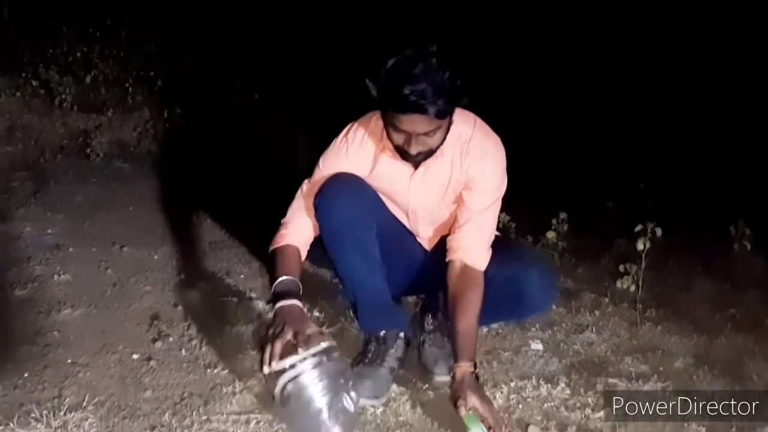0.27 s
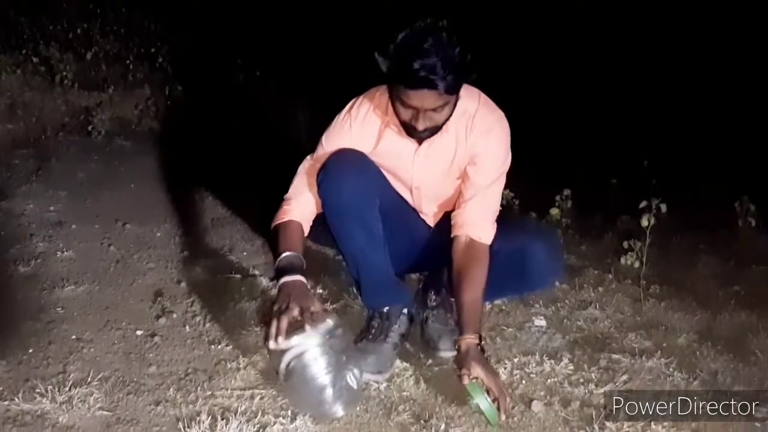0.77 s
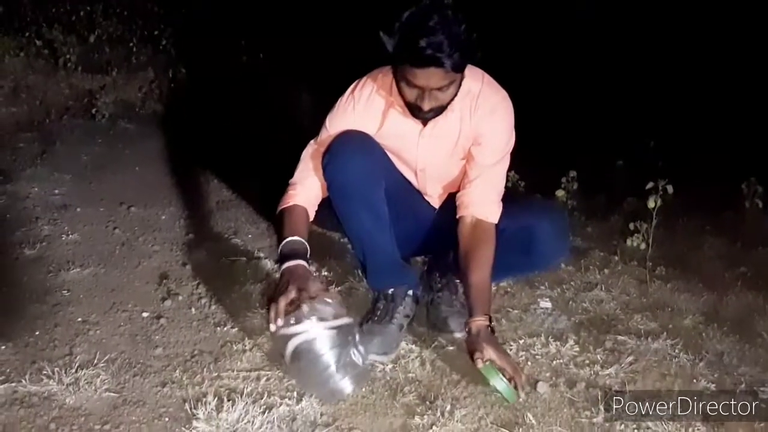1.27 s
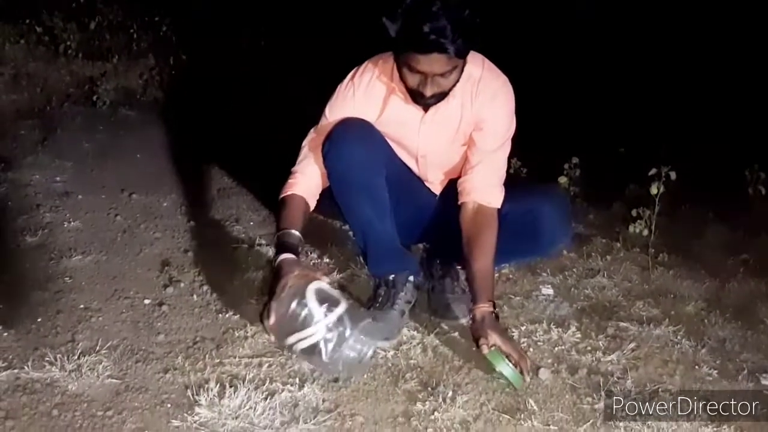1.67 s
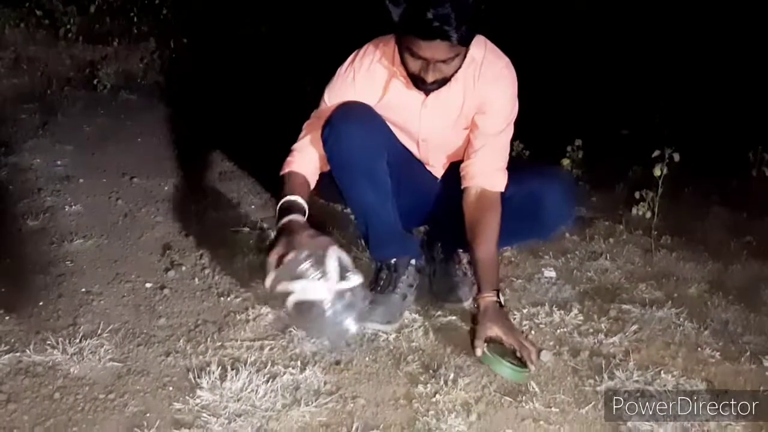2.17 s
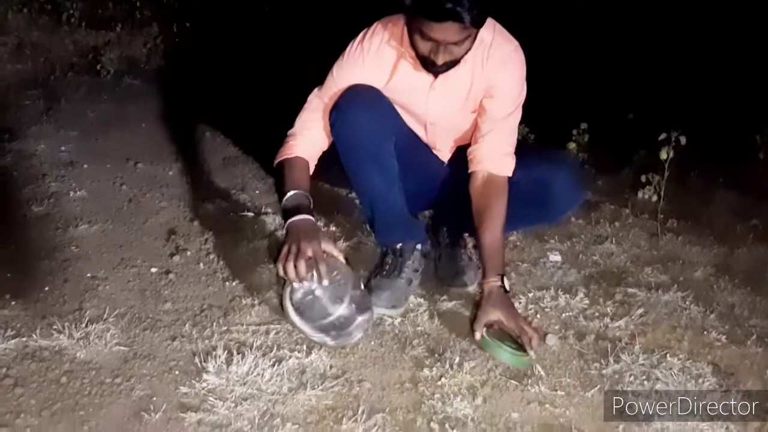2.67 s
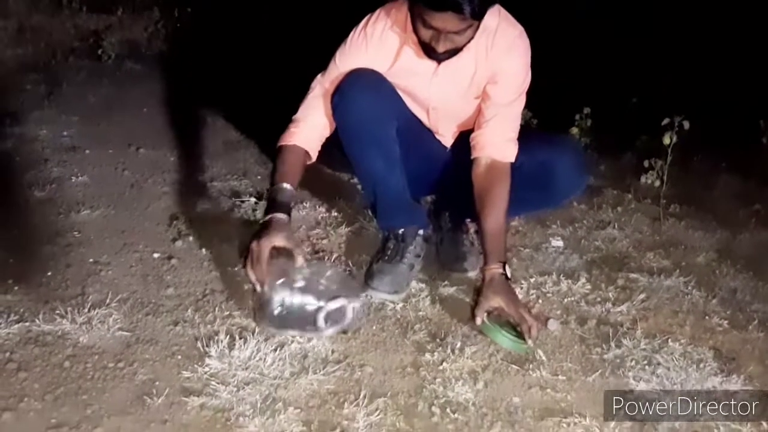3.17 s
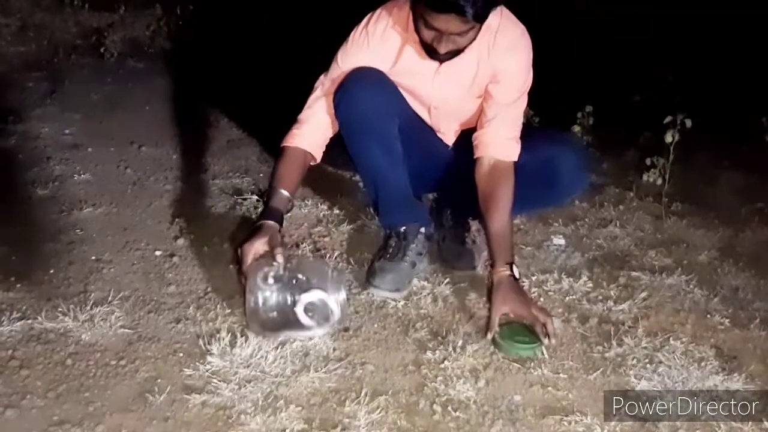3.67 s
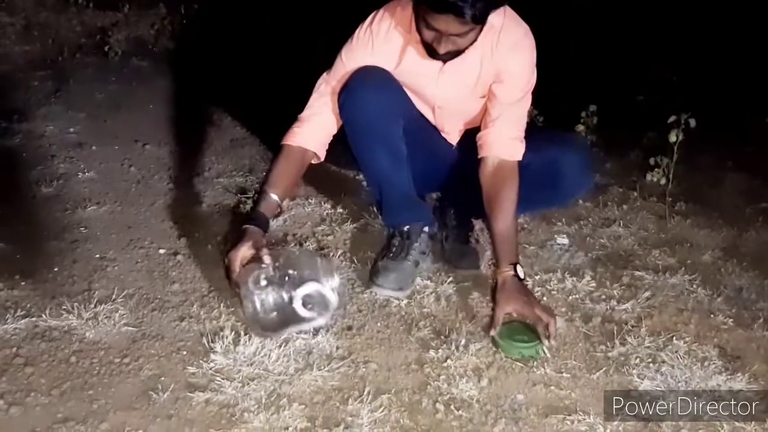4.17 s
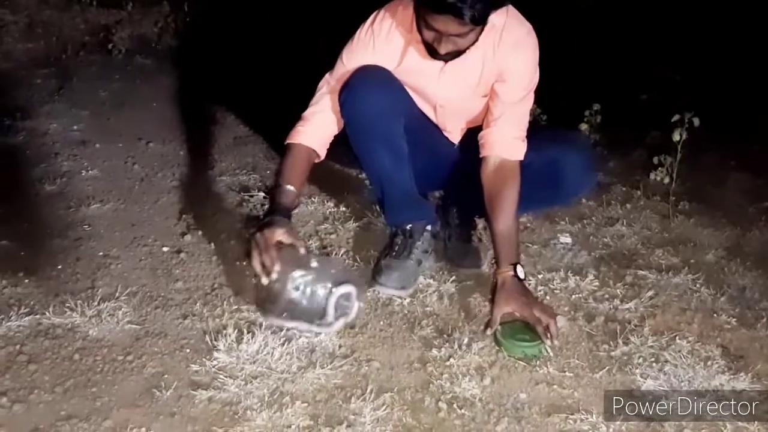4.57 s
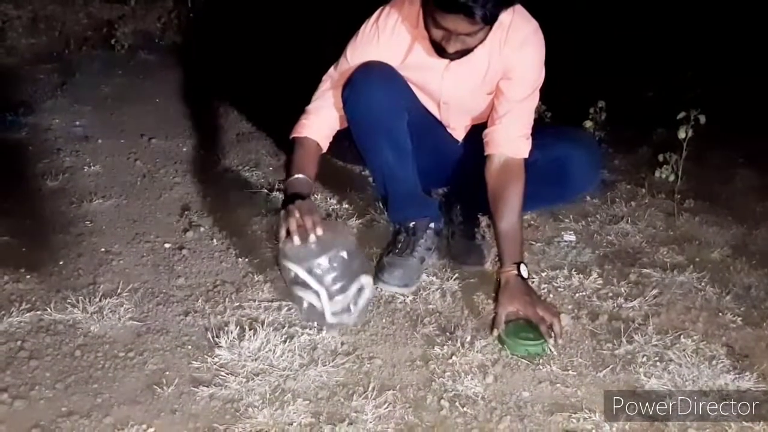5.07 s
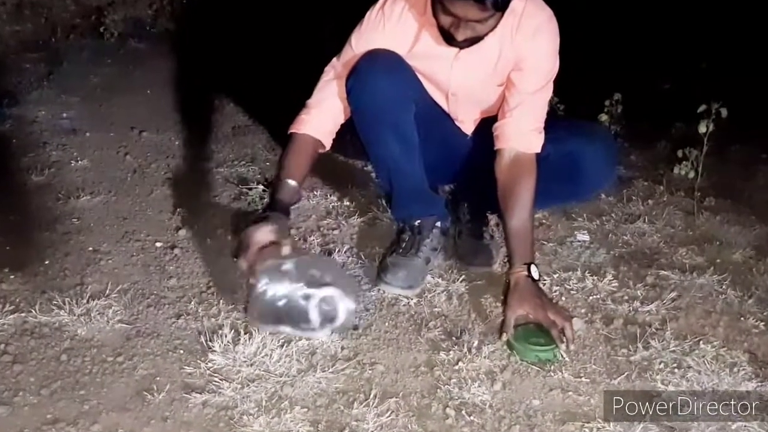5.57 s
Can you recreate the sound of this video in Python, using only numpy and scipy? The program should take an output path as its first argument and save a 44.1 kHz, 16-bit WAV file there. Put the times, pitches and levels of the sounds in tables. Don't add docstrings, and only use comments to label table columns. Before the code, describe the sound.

Close stereo pickup of a thin-walled jar moved by hand over dry grass and grit: crisp taps with low hollow booms first, a quiet gap, a clattering roll and a rumbling gravel scrape midway, then dry stalk swishes and loud brittle snaps. Continuous fast, buzzing insect trills fill the open night air, with almost no reverberation; the jar leans right.

```python
import sys
import numpy as np
from scipy import signal
from scipy.fft import rfft, irfft, next_fast_len
from scipy.io import wavfile
from scipy.ndimage import uniform_filter1d, minimum_filter1d, map_coordinates

SR = 44100
rng = np.random.default_rng(int(sys.argv[2]) if len(sys.argv) > 2 else 0)


def wav_out(sig):
    wavfile.write(sys.argv[1], SR, np.round(np.clip(np.atleast_2d(sig).T, -1, 1) * 32767).astype(np.int16))


def makeup_ratio(level_db):
    decades = np.asarray(level_db, float) / 20
    return 10 ** decades


N = 256087

# time in seconds, high singer in cycles, low singer in cycles.
TRILL_DRIFT = [(0, 0, .4), (.5, -.31, .3), (1, -.57, .15), (1.5, -.71, .2), (2.25, -.64, .21),
               (2.5, -.72, .24), (3.1, -.83, .27), (4, -.73, .38), (5, -.62, .5), (5.81, -.5, .5)]
# start in seconds, end in seconds, level in dB.
LOW_LEAN = [(1.2, 4.4, -9)]
# time in seconds, right over left in dB.
TRILL_FACING = [(0, -11.5), (3.1, -16.5), (3.5, -3.5), (4.3, -5.5), (4.6, -8), (5.81, -6.5)]
# centre in Hz, width in Hz, level in dB.
CHORUS_BANDS = [(2380, 220, -69), (3640, 140, -74)]
# start in seconds, end in seconds, level in dB.
CRICKET_BOUTS = [
    (-.1, .33, -71),
    (.58, 1.0, -72),
    (1.32, 1.775, -73),
    (2.15, 2.41, -71),
    (2.88, 3.12, -73),
]
# time into the bout in seconds, wing strokes per second.
CRICKET_TIRING = [(.1, 43), (.27, 25)]
# start in seconds, end in seconds, level in dB.
THIN_SWELLS = [
    (.07, .22, -68),
    (.62, .86, -66.5),
    (1.7, 1.86, -68),
    (2.78, 3.0, -67),
    (3.95, 4.13, -56),
    (4.84, 4.96, -71.5),
    (5.06, 5.2, -59),
]
# frequency in Hz, density in dB per Hz.
AIR_SPECTRUM = [(30, -110), (70, -88.5), (200, -103), (1000, -109), (3000, -111), (5500, -113),
                (8300, -116), (9300, -114), (11500, -112), (15300, -112), (16000, -130)]

# centre in Hz, width in Hz, level in dB.
RUMBLE_MODES = [(48.3, 40, -3), (68.8, 29.5, 6), (128, 88.6, -2.5), (240, 186, -11.5)]
# peak in seconds, rise in seconds, fall in seconds, level in dB.
RUMBLE_BURSTS = [(.01, 0.058, 0.062, -47.5), (.14, 0.075, 0.07, -45), (.3, 0.13, 0.48, -50),
                 (.75, 0.27, 0.39, -69.5), (1.38, 0.38, 0.19, -65), (1.86, 0.016, 0.077, -48),
                 (2.13, 0.021, 0.066, -48.5), (2.64, 0.055, 0.085, -35), (2.82, 0.13, 0.17, -48.5),
                 (3.06, 0.12, 0.073, -38.5), (3.2, 0.081, 0.088, -36), (3.33, 0.092, 0.23, -33),
                 (3.67, 0.14, 0.14, -51), (3.82, 0.051, 0.084, -43.5), (3.94, 0.092, 0.068, -52.5),
                 (4.3, 0.12, 0.6, -51.5), (4.74, 0.136, 0.16, -56), (5.1, 0.1, 0.16, -56.5),
                 (5.29, 0.039, 0.17, -74)]
# centre in Hz, width in Hz, level in dB.
SHELL_MODES = [(2540, 460, -9), (2700, 160, -4.5), (3360, 84, -2), (3558, 170, 5), (3710, 360, 3.5),
               (4414, 260, 7), (4890, 340, -3.5), (5224, 320, -0.5), (5680, 93, -5.5), (6010, 260, -2.5),
               (6900, 3600, -14.5)]
# centre in Hz, width in Hz, level in dB.
WALL_MODES = [(556, 140, -3.5), (945, 88, 0), (1063.6, 62, 2), (1286, 140, -2.5), (1540, 170, -1.5),
              (2018, 88, -0.5), (2270, 260, -8), (2790, 210, -4), (3230, 340, -9.5)]
# centre in Hz, width in Hz, level in dB.
BODY_MODES = [(165, 30, -5), (218, 18, 1.5), (273, 28, 3.5), (350, 52, -9.5), (428, 38, 0), (627, 200, -10)]
# centre in Hz, width in Hz, level in dB.
BOOM_MODES = [(78.5, 25, -11.5), (103, 28, 10)]

# start in seconds, crack in dB,
# body over crack in dB, panel note in Hz, wall ring over crack in dB.
THUD_HITS = [
    (.1344, -64.5, 7.5, 265, -5),
    (.2074, -66, 12, 165, -1),
    (.068, -70.5, 12.5, 152, -9),
    (.35, -68.5, 8.5, 180, -10.5),
    (1.8489, -70, 11, 183, -12),
    (2.1202, -69.5, -8, 188, 8.5),
    (3.914, -43, -10.5, 414, -4),
]
# time in seconds, peak in dB.
PEBBLE_CLICKS = [
    (.128, -44),
    (2.12, -44),
    (2.698, -36),
    (3.1505, -12),
    (3.169, -35),
    (3.179, -33),
    (3.285, -33),
    (3.4066, -15),
    (3.503, -36),
]
# start in seconds, pitch in Hz, level in dB, t60 in seconds.
BODY_SWINGS = [(.135, 70, -28.5, 0.065), (.245, 100, -35, 0.07), (.295, 70, -36.5, 0.072),
               (.438, 265.3, -22.5, .13), (.59, 100, -32, 0.076), (.44, 655, -33.5, .12),
               (1.855, 200, -40.5, 0.038), (3.845, 132, -32, 0.055), (.906, 262, -21.5, .12),
               (.912, 106.5, -18.5, 0.087), (1.147, 290, -24.5, 0.12), (1.153, 114, -17, 0.072),
               (1.31, 240, -34.5, .1), (1.312, 109.3, -21, 0.075), (1.53, 140, -29, .06),
               (1.85, 74, -38.5, 0.067), (2.125, 84, -34.5, 0.13), (2.465, 240, -29.5, .08),
               (2.5, 128, -23, 0.084), (2.51, 261.7, -24.5, .1), (2.56, 240, -26, .06),
               (2.602, 237, -8.5, 0.077), (2.604, 129.3, -16.5, 0.13), (2.622, 250, -14, 0.077),
               (2.67, 250.7, -25, .06), (3.055, 70, -30.5, 0.081), (3.845, 400, -24, 0.027)]
# start in seconds, crack in dB,
# body over crack in dB, panel note in Hz, wall ring over crack in dB.
BASE_TAPS = [
    (.2382, -23.5, -12.5, 465, -14.5),
    (.2813, -46, 4.5, 243, -8.5),
    (.579, -27, -4, 430, -13.5),
    (.7227, -40, -15.5, 555, -15),
    (.9004, -11, -14, 413, -15),
    (1.1419, -14, -8.5, 332, -15),
    (1.3054, -24, 1.5, 200.4, -5),
    (1.5265, -22.5, -11, 463, -10),
]
# start in seconds, pitch in Hz, level in dB, t60 in seconds.
STRIKE_SPOTS = [(.2385, 4100, -25, 0.02), (.4155, 4280, -23, 0.019), (.431, 4000, -32, .03),
                (.431, 2153, -30, 0.075), (.5795, 3910, -30, 0.034), (.9005, 3754, -18, 0.042),
                (.9005, 4000, -15.5, 0.033), (.9005, 4930, -23, 0.034), (1.142, 3770, -45, 0.033),
                (2.497, 1062, -11.5, 0.044), (2.497, 2006, -9, 0.032), (2.5965, 2910, -15, 0.016),
                (2.5965, 1510, -18, 0.026), (4.383, 2275, -3, 0.015), (4.383, 2740, -13.5, 0.066),
                (4.383, 3170, -3.5, 0.018), (4.383, 3470, -17.5, .03), (4.384, 4400, -16, 0.05),
                (4.383, 5120, -4.5, 0.024), (4.383, 2048, -17.5, 0.091), (5.282, 4040, -11.5, 0.026),
                (5.282, 4570, -19, 0.037), (5.283, 5260, -8, 0.045), (5.282, 1042, -22.5, 0.053),
                (5.282, 3430, -17, .04)]
# peak in seconds, rise in seconds, fall in seconds, level in dB.
GRAVEL_GRINDS = [
    (.3, 0.081, 0.093, -64),
    (1.3, 0.34, 0.62, -63.5),
    (2.66, 0.16, 0.13, -49.5),
    (3.24, 0.19, 0.21, -45.5),
    (3.36, 0.12, 0.21, -38.5),
    (3.6, 0.1, 0.072, -58),
    (4.15, 0.27, 0.96, -60.5),
    (4.65, 0.29, 0.11, -49.5),
    (5.7, 0.08, 0.47, -59),
]
# frequency in Hz, level in dB.
GRAVEL_SPECTRUM = [(150, -43), (250, -3.5), (467, -6), (675, -5.5), (746, -11), (834, -11.5), (1510, -4),
                   (3600, -10), (5400, -23), (7920, -120)]
# start in seconds, crack in dB,
# body over crack in dB, panel note in Hz, wall ring over crack in dB.
DRY_SNAPS = [
    (.4152, -27, -31, 314, -34),
    (1.076, -58.5, -6, 294, -1.5),
    (4.8228, -45, -43, 295, -38.5),
]
# time in seconds, peak in dB.
PLASTIC_TICKS = [(0.422, -38), (0.5787, -51), (0.9023, -37.5), (1.1422, -36), (1.5249, -54),
                 (2.4873, -40.5), (2.597, -57.5), (3.045, -51.5), (3.8177, -45), (3.8397, -33.5),
                 (4.3226, -35.5), (4.3823, -26), (4.9732, -42.5), (5.282, -17), (5.6309, -47)]
# start in seconds, crack in dB,
# body over crack in dB, panel note in Hz, wall ring over crack in dB.
RATTLE_BUMPS = [
    (.4295, -15, -5.5, 427, -14.5),
    (3.045, -25, -41, 375, -9),
    (3.8135, -29, -26.5, 411, -24),
    (3.8212, -19.5, -48, 403, -9),
    (3.862, -29, -21.5, 302, -49),
    (4.5095, -25.5, -32.5, 460, -8.5),
]
# start in seconds, crack in dB,
# body over crack in dB, panel note in Hz, wall ring over crack in dB.
STALK_CATCHES = [(1.056, -70.5, 15, 195, -1), (2.468, -43, -27, 300, -25), (2.541, -49, -15, 300, -2),
                 (3.257, -44, -22, 300, -12), (3.33, -50, 8, 288, 4), (3.39, -38, -36, 298, -7),
                 (3.405, -29.5, -42, 300, -8.5), (3.455, -46, -34, 300, -26), (3.601, -50, -23, 500, 1),
                 (3.636, -46, -40, 300, -17.5), (3.74, -58, -30, 296, -26), (4.004, -57, -42, 300, -4),
                 (4.139, -52, -15, 302, -12), (4.213, -41, -18, 300, -29), (4.64, -32.5, -8, 435, -10.5),
                 (4.655, -32, -22, 458, -19), (4.7, -37, -30, 300, -23), (4.74, -41, -38, 300, -15),
                 (5.216, -41.5, -29, 298, -28), (5.315, -43, -8, 400, -18), (5.65, -31, -30.5, 302, -21),
                 (4.229, -44.5, -29, 296, -34), (4.276, -51, -30, 303, -25), (4.489, -35, -31, 300, -32),
                 (4.555, -49, -16, 470, -27), (4.721, -49, -30, 298, -29), (5.493, -45, -23, 303, -29.5),
                 (5.534, -38, -29, 300, -27), (5.584, -42.5, -28.5, 300, -31), (5.613, -51, -33, 302, -19),
                 (5.765, -46.5, -31, 304, -13.5)]
# peak in seconds, rise in seconds, fall in seconds, level in dB.
GRASS_SWISHES = [(1.33, 0.17, 1, -72), (2.0, .12, 0.084, -61), (2.46, 0.048, .1, -46.5),
                 (2.65, 0.11, 0.086, -48), (3.04, 0.044, 0.16, -54), (3.2, 0.042, 0.11, -61),
                 (3.38, 0.21, 0.127, -45.5), (3.46, 0.12, 0.087, -46.5), (3.68, 0.34, 0.65, -50),
                 (4.1, 0.14, 0.28, -52.5), (4.4, 0.21, 0.36, -47), (4.69, 0.17, 0.19, -39),
                 (5.22, 0.61, 0.13, -62.5), (5.52, 0.22, 0.22, -52), (5.65, 0.13, 0.076, -38.5),
                 (5.76, 0.15, 0.39, -44.5)]
# frequency in Hz, level in dB.
GRASS_SPECTRUM = [(1060, -27.5), (1800, -17), (2210, -15.5), (2810, -10), (4260, -2.5), (6900, -8),
                  (7930, -21.5), (8310, -28.5), (8700, -80.5), (10600, -26.5), (13200, -23), (15300, -38),
                  (16500, -66.5)]
# start in seconds, crack in dB,
# body over crack in dB, panel note in Hz, wall ring over crack in dB.
STONE_ROLLS = [(1.4615, -54.5, -2, 330, 3.5), (1.603, -55, 9.5, 350, 5.5), (2.4477, -40, 1.5, 327, 2.5),
               (2.4859, -22, -1.5, 244.3, 4.5), (2.556, -40.5, -1, 242.3, 2.5),
               (2.5959, -12.5, -11.5, 219.4, 1), (2.64, -35, 2.5, 379, 6), (2.6457, -30.5, -2, 230.8, 5.5),
               (2.668, -31, -8, 240, 4.5), (2.9118, -58, 18, 251, 4.5), (2.991, -55.5, 19.5, 197, 5),
               (3.8412, -10.5, -13, 307, 1.5)]
# start in seconds, crack in dB,
# body over crack in dB, panel note in Hz, wall ring over crack in dB.
RIM_CRACKS = [
    (1.9518, -38, -37, 199, -47),
    (1.991, -45, -20.5, 387, -17),
    (2.7313, -47, -12.5, 237.5, -20),
    (4.322, -20.5, -12.5, 422, -10.5),
    (4.3821, -4.5, -31.5, 389, -20),
    (5.281, -2, -20.5, 394, -15.5),
]
# start in seconds, crack in dB,
# body over crack in dB, panel note in Hz, wall ring over crack in dB.
SLOW_SCUFFS = [
    (2.4332, -47, 6, 300, -6.5),
    (3.1783, -38.5, -6, 240, -8),
    (3.2481, -41.5, 4.5, 215, 0),
    (3.3479, -42.5, -21, 196, 5.5),
    (3.5882, -55, -20, 483, 7.5),
    (3.7029, -62, -25, 180, -3),
    (4.0654, -31.5, -26.5, 493, -10),
]
# start in seconds, crack in dB,
# body over crack in dB, panel note in Hz, wall ring over crack in dB.
ROLL_JOLTS = [
    (2.466, -42, -2, 254, -2),
    (2.4952, -27, -0.5, 263, 4),
    (3.034, -43.5, 13.5, 503, 1.5),
]
# start in seconds, end in seconds, pitch in Hz, level in dB.
WALL_SQUEAKS = [(3.031, 3.054, 700, -43), (3.58, 3.638, 1080, -74.5), (3.768, 3.786, 1010, -46.5),
                (4.006, 4.138, 1540, -54.5), (3.026, 3.093, 1540, -47.5), (3.623, 3.734, 1540, -62),
                (4.149, 4.214, 996, -58), (4.21, 4.255, 945, -49.5), (4.254, 4.315, 980, -54.5),
                (4.557, 4.686, 498, -49.5), (4.707, 4.826, 1046, -62), (5.414, 5.587, 530, -75.5),
                (5.625, 5.757, 1430, -48.5), (5.72, 5.751, 422, -59.5)]
# start in seconds, crack in dB,
# body over crack in dB, panel note in Hz, wall ring over crack in dB.
WALL_BRUSHES = [
    (3.438, -32.5, -40, 250, -40),
    (4.6794, -28.5, -31, 532, -46),
    (4.97, -26, -19.5, 437, -24.5),
    (5.235, -39.5, -19.5, 405, -24),
    (5.637, -23, -32, 400, -33),
]

# frequency in Hz, left minus right in dB.
PORT_BALANCE = [(60, -11.5), (200, -9), (700, -9.5), (2400, -11.5), (4400, -18), (7000, -3.5), (13000, -12)]
# time in seconds, left port gain in dB.
LEFT_SHADE = [(0, 1), (.8, 4.5), (1.6, 3), (2.4, 5), (2.9, 5), (3.3, -7), (3.7, -1), (4.2, -3.5),
              (4.7, -0.5), (5.2, -2), (5.81, -1.5)]
# time in seconds, gain change in dB.
GAIN_DUCKS = [
    (4.393, -6.5),
    (5.285, -6.5),
]
# frequency in Hz, gain in dB.
MIC_RESPONSE = [(15, -14), (40, 1), (6000, -0.5), (8350, -9.5), (8550, -22.5), (10000, -11), (11500, 2),
                (15500, 6), (16600, -14.5)]


def unit(x):
    return x / np.sqrt(np.mean(x ** 2) + 1e-20)


def along(points, hz):
    f, v = np.transpose(points)
    return np.interp(np.log(hz + 1), np.log(f + 1), v)


def curves(rows):
    s, *columns = np.transpose(rows)
    return [np.interp(np.arange(N) / SR, s, column) for column in columns]


def ports(left_db, right_db):
    return makeup_ratio(np.array([[left_db], [right_db]]))


def wobble(rate):
    knots = rng.standard_normal(int(N * rate / SR) + 4)
    return map_coordinates(knots, [np.arange(N) * rate / SR])


def gated(bouts, ramp_s):
    t = np.arange(N) / SR
    return sum(makeup_ratio(db) * np.clip(np.minimum(t - a, b - t) / ramp_s, 0, 1) for a, b, db in bouts)


def strokes(rows, rest_db):
    t = np.arange(N) / SR
    gain = makeup_ratio(rest_db)
    for s, rise, fall, db in rows:
        away = np.clip(np.maximum((s - t) / rise, (t - s) / fall), 0, 1)
        gain = gain + makeup_ratio(db) * np.cos(np.pi / 2 * away) ** 2
    return gain


def filtered(x, response):
    m = next_fast_len(N + SR // 2)
    return irfft(rfft(x, m) * response(np.fft.rfftfreq(m, 1 / SR)), m)[..., :N]


def rung(x, modes):
    def response(f):
        return sum((-1) ** k * makeup_ratio(db) * 1j * f * width / (hz * hz - f * f + 1j * f * width)
                   for k, (hz, width, db) in enumerate(modes))
    return filtered(x, response)


def narrow_noise(shape, first, second):
    noise = rng.standard_normal(shape)
    return unit(rung(rung(noise, [(*first, 0)]), [(*second, 0)]))


def scattered(x, t60):
    t = np.arange(SR // 10) / SR
    tail = rng.standard_normal((2, len(t))) * makeup_ratio(-60 * t / t60)
    return signal.fftconvolve(x[None], tail / np.linalg.norm(tail[0]), axes=1)[:, :N]


def grit(rate, spread_db, share):
    struck = rng.random(N) < rate / SR * makeup_ratio(5 * wobble(25))
    size = makeup_ratio(spread_db * np.minimum(rng.exponential(size=N), 3))
    grains = unit(struck * size * rng.standard_normal(N))
    smooth = makeup_ratio(3.1 * wobble(40)) * rng.standard_normal(N)
    return share * grains + np.sqrt(1 - share ** 2) * smooth


def ringing(rows, cycles):
    t = np.arange(SR // 5) / SR
    out = np.zeros(N + len(t))
    for s, hz, db, t60 in rows:
        envelope = makeup_ratio(db - 60 * t / t60) * (1 - np.exp(-t * hz / cycles))
        out[round(s * SR):][:len(t)] += envelope * np.sin(2 * np.pi * hz * t)
    return out[:N]


def knocks(rows, rise_s, t60, linger_db, boom_db, lag_s):
    t = np.arange(SR // 6) / SR
    crack, ring, drum, note, boom = np.zeros((5, N + len(t)))
    rise = 1 - np.exp(-(t / rise_s) ** 2)
    linger = makeup_ratio(linger_db - 60 * t / 0.2)
    first = 0.69 * makeup_ratio(-60 * t / (18 * rise_s))
    crack_shape = (first + makeup_ratio(-60 * t / t60) + 0.41 * linger) * rise
    ring_shape = (first + makeup_ratio(-60 * t / (2.01 * t60)) + linger) * rise
    late = np.clip(t - rise_s - lag_s, 0, None)
    drum_shape = late / 0.0098 * np.exp(1 - late / 0.0057) + .5 * linger
    note_shape = late / 0.0058 * np.exp(1 - late / 0.0034)
    push = t - .009
    boom_shape = push / 0.0025 * np.exp(-(push / 0.0013) ** 2)
    for s, db, drum_db, drum_hz, ring_db in rows:
        start = round((s + .0007 - .8 * rise_s) * SR)
        at = slice(start, start + len(t))
        noise = rng.standard_normal((3, len(t)))
        noise[:2, round(rise_s * SR)] = 4
        crack[at] += makeup_ratio(db + 8) * crack_shape * noise[0]
        ring[at] += makeup_ratio(db + ring_db + 16.5) * ring_shape * noise[1]
        drum[at] += makeup_ratio(db + drum_db + 19.5) * drum_shape * noise[2]
        panel = np.sin(2 * np.pi * drum_hz * late * (1.08 - 4.0 * late))
        note[at] += makeup_ratio(db + drum_db + 6.0) * note_shape * panel
        boom[at] -= makeup_ratio(db + drum_db + boom_db + 16.5) * boom_shape
    direct = makeup_ratio(-9.0) * rung(crack[:N], [(4000, 1700, 0.0037)])
    shell = rung(crack[:N], SHELL_MODES)
    wall = rung(ring[:N], WALL_MODES)
    body = rung(drum[:N], BODY_MODES) + note[:N] + rung(boom[:N], BOOM_MODES)
    return signal.sosfilt(signal.butter(4, 7600, fs=SR, output="sos"), direct + shell + wall + body)


def singer(cycles, top_hz, fall_hz, duty, scatter_db):
    part = cycles % 1 / duty
    stroke = (cycles - cycles.min()).astype(int)
    size, pitch = rng.standard_normal((stroke.max() + 2, 2))[stroke].T
    hz = top_hz * (1 + .008 * pitch) - fall_hz * part
    tone = np.sin(2 * np.pi * np.cumsum(hz) / SR)
    shape = np.sin(np.pi * np.clip(part, 0, 1)) ** .9 * makeup_ratio(.8 * wobble(200))
    return unit(makeup_ratio(scatter_db * size) * shape * tone)


def trillers():
    t = np.arange(N) / SR
    high_drift, low_drift = curves(TRILL_DRIFT)
    high = singer(51 * t + high_drift + .24, top_hz=8330, fall_hz=1500, duty=.5, scatter_db=1.2)
    low = singer(44 * t + low_drift + .31, top_hz=7350, fall_hz=1150, duty=.45, scatter_db=2)
    low = low * (makeup_ratio(-5) + gated(LOW_LEAN, ramp_s=0.2))
    far = 0
    for rate, hz in [(47, 7450), (53, 7700), (41, 7250), (57, 8050)]:
        cycles = np.cumsum(rate + wobble(.7)) / SR
        far = far + singer(cycles, top_hz=hz, fall_hz=1100, duty=.5, scatter_db=2)
    echoes = makeup_ratio(-14.5) * scattered(high + .6 * low, t60=.06) + makeup_ratio(-17.5) * scattered(far, t60=.15)
    near = makeup_ratio(-7) * (ports(-3, -6) * high + ports(-8, -8) * low)
    trill = filtered(near + echoes, lambda hz: 1 / (1 + (hz / 8420) ** 70))
    facing_db = curves(TRILL_FACING)[0] * np.array([[0], [1]])
    return makeup_ratio(-41 + facing_db) * trill


def choruses():
    sway_db = 1.5 * wobble(2.5) + 2.2 * wobble(45)
    return sum(makeup_ratio(db + sway_db) * narrow_noise((2, N), (hz, width), (hz, width))
               for hz, width, db in CHORUS_BANDS)


def tiring():
    t, starts = np.arange(N) / SR, np.array(CRICKET_BOUTS)[:, 0]
    bout = np.searchsorted(starts, t) - 1
    count = np.cumsum(np.interp(t - starts[bout], *np.transpose(CRICKET_TIRING))) / SR
    at_start = np.interp(starts, t, count)
    fresh = np.ceil(at_start) - at_start + np.arange(len(starts))
    return count + fresh[bout]


def low_cricket():
    song = singer(tiring(), top_hz=4800, fall_hz=580, duty=.42, scatter_db=2)
    return gated(CRICKET_BOUTS, ramp_s=.03) * (song + .8 * scattered(song, t60=.09))


def night_air():
    noise = rng.standard_normal((2, N))
    hiss = filtered(noise, lambda hz: makeup_ratio(along(AIR_SPECTRUM, hz)) * np.sqrt(SR / 2))
    return hiss * ports(-5, 0) * makeup_ratio(1.6 * wobble(14.0))


def port_rumble():
    shaking = makeup_ratio(4.7 * wobble(29)) * rng.standard_normal(N)
    return strokes(RUMBLE_BURSTS, rest_db=-72.5) * unit(rung(shaking, RUMBLE_MODES))


def thuds():
    return knocks(THUD_HITS, rise_s=0.00034, t60=0.013, linger_db=-37, boom_db=11.8, lag_s=0.00202)


def thin_cricket():
    return gated(THIN_SWELLS, ramp_s=0.049) * narrow_noise(N, (3670, 81), (3670, 81))


def pebbles():
    clicks = np.zeros(N)
    s, db = np.transpose(PEBBLE_CLICKS)
    clicks[np.round(s * SR).astype(int)] = makeup_ratio(db)
    return rung(rung(clicks, [(2600, 5000, 0)]), [(3200, 6000, 0)])


def body_swings():
    return ringing(BODY_SWINGS, cycles=.75)


def taps():
    return knocks(BASE_TAPS, rise_s=0.00032, t60=0.019, linger_db=-17, boom_db=-0.99, lag_s=0.00341)


def strike_spots():
    return ringing(STRIKE_SPOTS, cycles=1.1)


def gravel_grind():
    rub = grit(rate=1500, spread_db=4.5, share=.78) * makeup_ratio(1.3 * wobble(14))
    rub = filtered(rub, lambda hz: makeup_ratio(along(GRAVEL_SPECTRUM, hz))) + 0.059 * rung(rub, WALL_MODES)
    return strokes(GRAVEL_GRINDS, rest_db=-95.5) * unit(rub)


def snaps():
    return knocks(DRY_SNAPS, rise_s=0.00012, t60=0.078, linger_db=-47.5, boom_db=6, lag_s=0.001)


def ticks():
    t = np.arange(SR // 20) / SR
    out = np.zeros(N + len(t))
    for s, db in PLASTIC_TICKS:
        out[round(s * SR):][:len(t)] += makeup_ratio(db - 2.0 - 60 * t / 0.014) * rng.standard_normal(len(t))
    return rung(out[:N], [(12000, 4500, 6.0), (14700, 1800, -10.5), (7270, 1000, -4.0)])


def bumps():
    return knocks(RATTLE_BUMPS, rise_s=0.0013, t60=0.021, linger_db=-20.5, boom_db=-48, lag_s=0.0018)


def catches():
    return knocks(STALK_CATCHES, rise_s=.0025, t60=.03, linger_db=-15, boom_db=-15, lag_s=.002)


def grass_swish():
    def colour(hz):
        return makeup_ratio(along(GRASS_SPECTRUM, hz) - 1.3 * (abs(hz - 7200) < 1100))
    stalks = grit(rate=1200, spread_db=3, share=.7) * makeup_ratio(1.5 * wobble(60))
    grass = unit(filtered(stalks + 0.59 * rung(stalks, SHELL_MODES), colour))
    return strokes(GRASS_SWISHES, rest_db=-68.0) * grass


def rolls():
    return knocks(STONE_ROLLS, rise_s=0.00026, t60=0.017, linger_db=-36, boom_db=-10, lag_s=0.00082)


def cracks():
    return knocks(RIM_CRACKS, rise_s=0.00033, t60=0.029, linger_db=-24.5, boom_db=-30, lag_s=0.00037)


def scuffs():
    return knocks(SLOW_SCUFFS, rise_s=0.0033, t60=0.021, linger_db=-26, boom_db=-12.5, lag_s=0.00356)


def jolts():
    return knocks(ROLL_JOLTS, rise_s=0.0014, t60=0.033, linger_db=-35, boom_db=-4.5, lag_s=0.0025)


def squeaks():
    t = np.arange(N) / SR
    out = np.zeros(N)
    for a, b, hz, db in WALL_SQUEAKS:
        shape = np.sin(np.pi * np.clip((t - a) / (b - a), 0, 1)) ** .5
        mode = narrow_noise(N, (.96 * hz, .2 * hz), (1.05 * hz, .22 * hz))
        out += shape * makeup_ratio(db + 3.5 * wobble(70)) * mode
    return out


def brushes():
    return knocks(WALL_BRUSHES, rise_s=0.0038, t60=0.032, linger_db=-0.65, boom_db=-22.5, lag_s=0.0014)


def at_ports(jar):
    lag = -4
    near = filtered(jar, lambda hz: [makeup_ratio(along(PORT_BALANCE, hz)) * np.exp(-2j * np.pi * hz * lag / SR),
                                     1 + 0 * hz])
    shade_db = curves(LEFT_SHADE)[0]
    return 1.13 * near * np.array([makeup_ratio(shade_db), np.ones(N)])


def scene():
    contacts = thuds() + taps() + snaps() + bumps() + catches() + rolls() + cracks() + scuffs() + jolts() + brushes()
    friction = gravel_grind() + grass_swish() + squeaks()
    jar = contacts + friction + pebbles() + body_swings() + strike_spots()
    jar = jar + makeup_ratio(-9.0) * scattered(jar, t60=0.033)
    tick = ticks()
    jar = jar + tick + makeup_ratio(-5.5) * scattered(tick, t60=.09)
    insects = trillers() + (low_cricket() + thin_cricket() + choruses()) * ports(-9, 0)
    return at_ports(jar) + port_rumble() * ports(-22, 0) + insects + night_air()


def ducked(x):
    t = np.arange(N) / SR
    duck_s, recover_s = 0.01, 0.95
    gain_db = sum(db * np.clip((t - s) / duck_s, 0, 1) * np.exp(-np.clip(t - s, 0, None) / recover_s)
                  for s, db in GAIN_DUCKS)
    return x * makeup_ratio(gain_db)


def limited(x):
    need = np.minimum(1, .99 / (np.abs(x).max(axis=0) + 1e-9))
    return x * uniform_filter1d(minimum_filter1d(need, size=161), size=81)


def band_limit(x):
    return signal.sosfilt(signal.butter(12, 16680, fs=SR, output="sos"), x)


def record(dry):
    wet = filtered(ducked(dry), lambda hz: makeup_ratio(along(MIC_RESPONSE, hz)))
    return band_limit(limited(wet))


dry = scene()
out = record(dry)
wav_out(out)
```